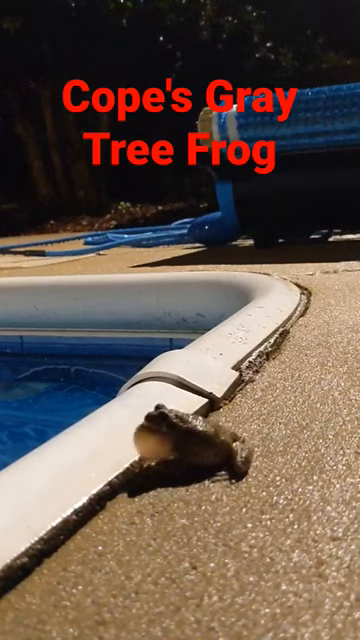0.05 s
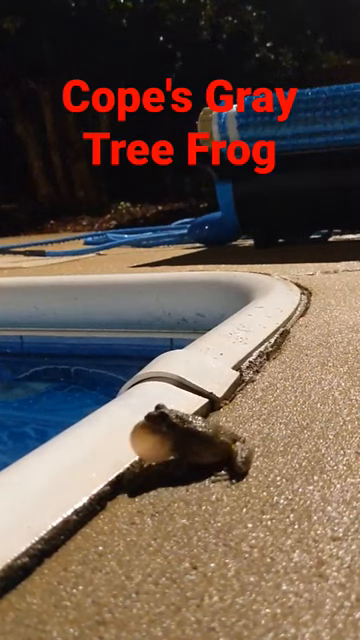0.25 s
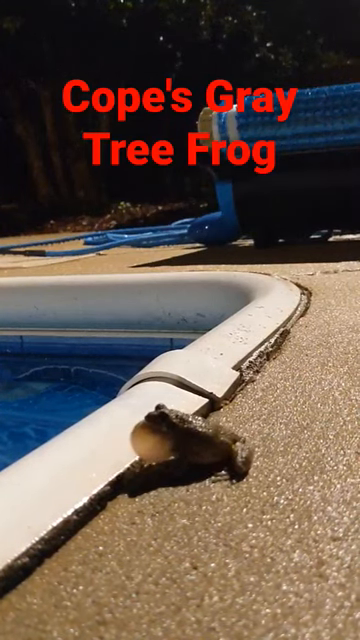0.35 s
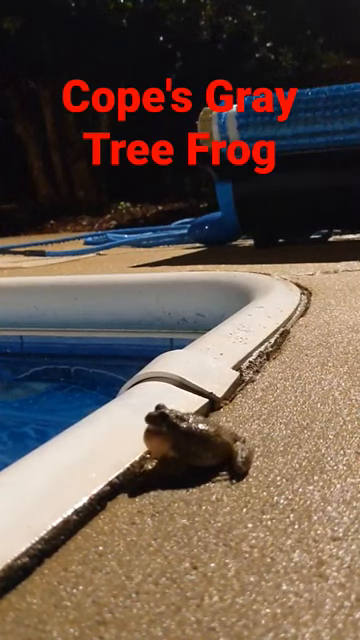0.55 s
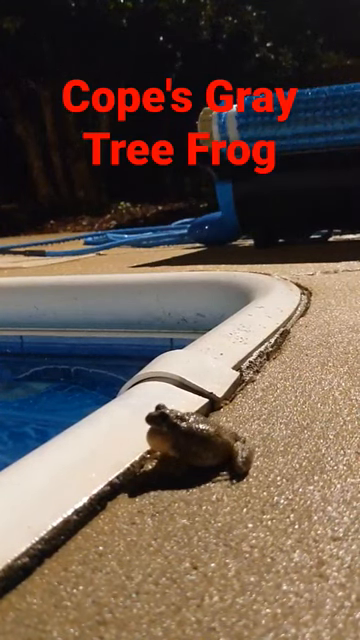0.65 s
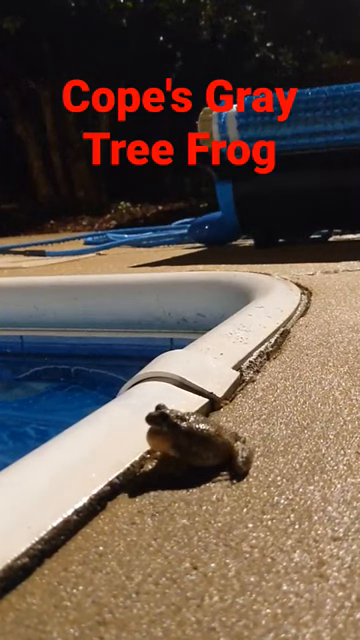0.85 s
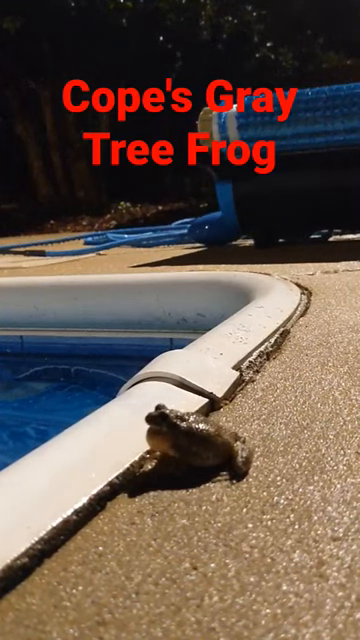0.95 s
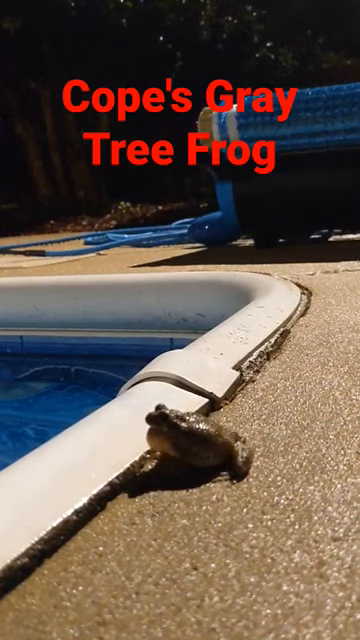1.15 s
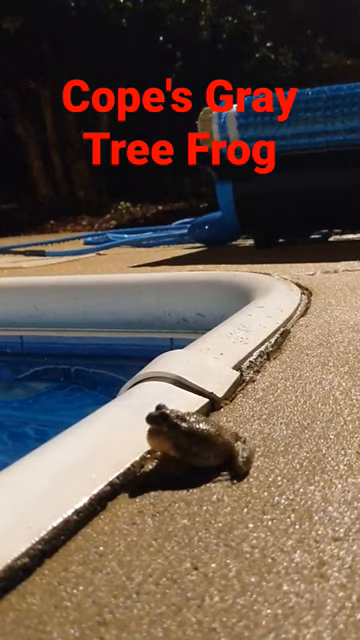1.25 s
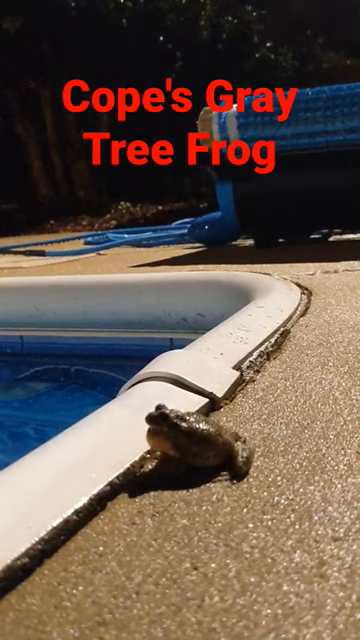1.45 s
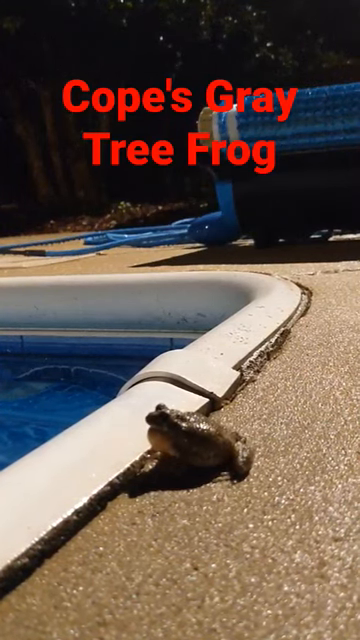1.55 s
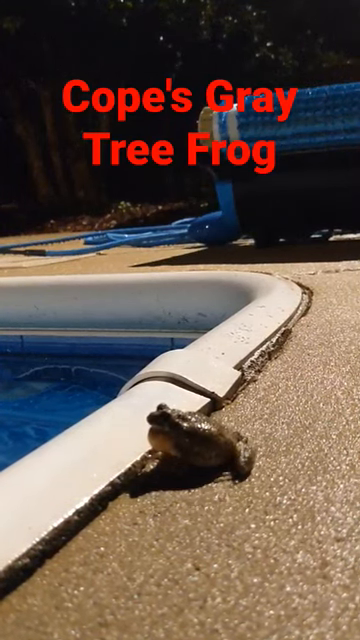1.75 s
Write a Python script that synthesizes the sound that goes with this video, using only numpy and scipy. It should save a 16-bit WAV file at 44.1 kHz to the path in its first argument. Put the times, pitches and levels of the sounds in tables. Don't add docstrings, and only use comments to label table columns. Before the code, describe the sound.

A tree frog close to the microphone gives a short, loud, buzzy trill of rapid rising chirps with slight echoes off hard walls; a farther frog answers softly, over pump hum, insect hiss and distant chorus.

```python
import sys
import numpy as np
from scipy import signal
from scipy.fft import rfft, irfft
from scipy.io import wavfile

SR = 44100
rng = np.random.default_rng(int(sys.argv[2]) if len(sys.argv) > 2 else 0)


def master_out(mix):
    frames = np.transpose(np.atleast_2d(mix))
    ceiling = np.clip(frames, -1, 1)
    pcm = np.round(ceiling * 32767).astype(np.int16)
    wavfile.write(sys.argv[1], SR, pcm)


def convert_level_to_amplitude(level_db):
    exponent = np.asarray(level_db, float) / 20
    return 10 ** exponent


N = 79380

# pitch_hz, level_db
AIR_TONE = [(30, -28), (42, -5), (100, -4), (300, -5.5), (1700, -20.5), (5000, -24), (8000, -31.5),
            (16000, -38)]
# pitch_hz, level_db
PUMP_HUM = [(53.5, -63), (58.3, -61.5), (120, -55.5), (126, -57), (156.5, -71), (240, -64), (291.5, -51),
            (350, -59.5), (360, -67), (419, -64.5), (480, -68), (581, -72.5), (640, -70), (700, -74)]
# pitch_hz, width_hz, throb_per_s, throb_db, level_db
CHORUS = [(1287, 570, 16, 4, -65), (2425, 460, 15, 1.5, -57), (3020, 320, 34, 0.5, -68),
          (4105, 780, 8.3, 3, -65.5), (5873, 566, 60, 1, -54), (9600, 1500, 24, -4.5, -76)]
# start_s, length_s, first_hz, last_hz, level_db
SQUEAKS = [
    (1.123, .07, 11600, 10900, -80),
    (1.28, .06, 11100, 11600, -79),
    (1.346, 0.045, 11800, 11000, -73),
    (1.533, .05, 11000, 11900, -72.5),
    (1.562, 0.079, 9500, 10400, -66.5),
    (1.59, .1, 14800, 15100, -80),
]
# start_s, fade_s, level_db
RUSTLES = [
    (0.777, 0.037, -57.5),
    (1.078, 0.013, -64),
    (1.66, .03, -62),
]
# peak_s, level_db
FAR_CHIRPS = [(0.685, -38.5), (0.7069, -42), (0.729, -40), (0.7483, -42), (0.768, -42.4), (0.7875, -42),
              (0.8092, -42), (0.8308, -41), (0.851, -41.5), (0.8725, -41), (0.893, -42), (0.915, -39),
              (0.937, -40.5), (0.9573, -39.5), (0.978, -40.7), (0.9995, -39.5), (1.0213, -40),
              (1.0434, -39.2), (1.0655, -39.5), (1.0862, -39), (1.1077, -39), (1.1301, -38), (1.1518, -40),
              (1.1737, -38.5), (1.1947, -39.5), (1.2187, -37.5)]
# pitch_hz, level_db
FAR_DULLNESS = [(2800, 0), (3150, -14), (3500, -14)]
ECHO_S = [.0033, .008, .0125, .03, .036, .053, .077, .081]
ECHO_DB = [-12, -20, -25, -19, -27, -27, -26, -27]
# peak_s, level_db
CHIRPS = [(0.2175, -18.9), (0.2407, -9.1), (0.2595, -6.2), (0.2798, -5.8), (0.3008, -5.3), (0.3214, -5.3),
          (0.3422, -6.0), (0.362, -5.7), (0.3832, -5.8), (0.4033, -5.9), (0.424, -6.0), (0.4446, -5.4),
          (0.4651, -5.9), (0.4854, -5.5), (0.5058, -5.5), (0.5263, -6.1), (0.547, -5.7), (0.5675, -5.6),
          (0.5887, -5.8), (0.6098, -5.0), (0.6315, -5.6), (0.6529, -5.7)]
# time_s, middle_pitch_hz, rise_hz_per_s, ring_s, fundamental_db, upper_partials_db, rasp_db
SAC = [
    (.217, 974, 30000, 0.003, 2, 10, -36),
    (0.24, 1183, 13900, 0.0023, 2, -15, -4),
    (0.256, 1138, 20400, 0.0029, -6, -1, 4),
    (0.298, 1213, 29200, 0.0028, -12.5, 1.5, 4),
    (.42, 1228, 33200, 0.0025, -12, -2, -2),
    (.652, 1236, 31600, 0.0031, -12, -4, -2.5),
]
PARTIALS_DB = [-12, -35, -33, -30.5]
# pitch_hz, level_db
RASP_TONE = [(3000, 17), (6000, 4), (8300, 2), (9000, -13), (11000, -15), (15800, -13)]
# pitch_hz, rise_hz_per_s, fade_s, level_db
WHISTLES = [
    (8050, -10000, .002, -35),
    (9750, -30000, .003, -45),
    (12000, -50000, .004, -48),
    (14950, -50000, .004, -47),
]
WHISTLE_LAG_S = [-.0005, .001, .0015, -.001]
# time_s, pitch_share
WHISTLE_TUNE = [(.238, .9), (.26, .96), (.3, 1.03), (.4, 1.0), (.65, .995)]
# pitch_hz, level_db
SAC_TONE = [(650, -12.5), (900, 4.5), (1100, 0)]
# time_s, level_db
GAIN = [
    (0, 6.5),
    (0.232, 6.5),
    (.27, -3.5),
    (.45, -7),
    (.66, -7),
    (.7, -4.5),
    (1.1, -2.5),
    (1.35, -1.5),
    (1.8, 1),
]

JITTER = .003


def evened(x):
    return x / np.sqrt(np.mean(x ** 2) + 1e-20)


def coloured(x, points):
    f, db = np.transpose(points)
    hz = np.fft.rfftfreq(len(x), 1 / SR)
    gain = convert_level_to_amplitude(np.interp(np.log(hz + 1), np.log(f), db))
    return irfft(rfft(x) * gain, len(x))


def band(x, hz, width_hz):
    f = np.fft.rfftfreq(len(x), 1 / SR)
    return irfft(rfft(x) / (1 + ((f - hz) / width_hz * 2) ** 4), len(x))


def add(mix, s, sound):
    part = mix[round(s * SR):][:len(sound)]
    part += sound[:len(part)]


def drift(per_s):
    return evened(band(rng.standard_normal(N), 0, 2 * per_s))


def bell(t, rise, fall):
    return np.exp(-.5 * (t / np.where(t < 0, rise, fall)) ** 2)


def tail(x, t60):
    t = np.arange(SR // 2) / SR
    sparse = rng.standard_normal(len(t)) * (rng.random(len(t)) < .06)
    taps = sparse * convert_level_to_amplitude(-60 * t / t60) * (t > .005)
    return signal.fftconvolve(x, taps / np.linalg.norm(taps))[:N]


def night():
    t = np.arange(N) / SR
    out = convert_level_to_amplitude(-55) * evened(coloured(rng.standard_normal(N), AIR_TONE))
    for hz, db in PUMP_HUM:
        level = convert_level_to_amplitude(db + 2.5 + 1.0 * drift(2))
        out += level * np.sin(2 * np.pi * (hz * t + .02 * drift(9) + rng.random()))
    for hz, width_hz, throb, throb_db, db in CHORUS:
        level = convert_level_to_amplitude(db + throb_db * drift(throb) + 0.4 * drift(7.5))
        out += level * evened(band(rng.standard_normal(N), hz, width_hz))
    return out


def small_things():
    out = np.zeros(N)
    for s, length, first_hz, last_hz, db in SQUEAKS:
        u = np.arange(0, 1, 1 / (length * SR))
        hz = first_hz + (last_hz - first_hz) * np.sin(u * np.pi / 2) + 60 * drift(60)[:len(u)]
        swell = np.sin(np.pi * u) ** .5
        add(out, s, convert_level_to_amplitude(db) * swell * np.sin(2 * np.pi * np.cumsum(hz) / SR))
    t = np.arange(SR // 8) / SR
    for s, fade, db in RUSTLES:
        add(out, s, convert_level_to_amplitude(db) * np.exp(-t / fade) * band(rng.standard_normal(len(t)), 11000, 7500))
    return out


def far_frog():
    middle_hz, rise_hz_per_s, swell_s = 1270, 50000, .0018
    out, t = np.zeros(N), np.arange(-441, 441) / SR
    for (s, db), luck in zip(FAR_CHIRPS, rng.standard_normal((len(FAR_CHIRPS), 2))):
        hz = middle_hz * (1 + JITTER * luck[0]) + rise_hz_per_s * t / 2
        turns = 2 * np.pi * hz * t
        chirp = np.sin(turns) + convert_level_to_amplitude(0.59 * luck[1]) * np.sin(2 * turns) + convert_level_to_amplitude(-32) * np.sin(3 * turns)
        add(out, s - .01, convert_level_to_amplitude(db + 2) * bell(t, swell_s, swell_s * 1.5) * chirp)
    echo = convert_level_to_amplitude(-11.5) * np.roll(out, round(.0045 * SR))
    out = coloured(out + echo, FAR_DULLNESS)
    wet = tail(out, 0.29)
    return out + convert_level_to_amplitude(-2.5) * (.5 * wet + band(wet, 2550, 1400))


def walls(x):
    taps = np.zeros(SR // 8)
    for s, db in zip(ECHO_S, ECHO_DB):
        taps[round(s * SR)] = convert_level_to_amplitude(db)
    back = signal.fftconvolve(x, taps)[:N] + convert_level_to_amplitude(-27) * tail(x, .4)
    return band(back, 2500, 1600) + .12 * back


def voice(u, turns, ring, low_db, up_db):
    rise_s, fall_s, late_s = .0021, .0016, .0017
    low = np.where(u < late_s, bell(u - late_s, 0.0039, 1), np.exp(-(u - late_s) / (ring + .001)))
    after = 0.1 * (u > 0) * (1 - bell(u, 1, fall_s)) * np.exp(-u / ring)
    sound = convert_level_to_amplitude(low_db) * low * np.sin(turns)
    sound += (bell(u, rise_s, fall_s) + after) * np.sin(2 * turns)
    for multiple, db in enumerate(PARTIALS_DB, 3):
        sound += convert_level_to_amplitude(db + up_db) * bell(u - .0005, .0022, .0013) * np.cos(multiple * turns)
    return sound


def whistles(s, t, thin_db, luck, fuzz):
    tune = np.interp(s, *np.transpose(WHISTLE_TUNE)) + JITTER * luck
    sound = np.zeros(len(t))
    for (hz, glide_hz, fade, db), lag, wobble in zip(WHISTLES, WHISTLE_LAG_S, fuzz):
        swell = np.where(t < lag, bell(t - lag, .0021, 1), np.exp(-(t - lag) / fade))
        if hz < 9000:
            filling_db = 14 if s < .25 else 0
        else:
            filling_db = np.interp(s, [.25, .32], [-14, 0])
        tone = np.sin(2 * np.pi * (hz * tune + glide_hz * t / 2) * t)
        sound += convert_level_to_amplitude(db + thin_db + filling_db) * swell * (1.2 + wobble) * tone
    return sound


def frog():
    out, t, sac = np.zeros(N), np.arange(-441, 882) / SR, np.transpose(SAC)
    chance = rng.standard_normal((len(CHIRPS), 2))
    hiss = evened(coloured(rng.standard_normal(N), [(2000, -46), *RASP_TONE]))
    fuzz = [drift(250) for _ in WHISTLES]
    for (s, db), luck in zip(CHIRPS, chance):
        hz, rise_hz, ring, low_db, up_db, thin_db = (np.interp(s, sac[0], c) for c in sac[1:])
        u = t / (.6 if s < .23 else 1)
        now = slice(round(s * SR), round(s * SR) + len(t))
        sweep_hz = hz * (1 + JITTER * luck[0]) + rise_hz * 0.0058 * np.tanh(t / 0.0035)
        turns = np.cumsum(sweep_hz) / SR
        turns = 2 * np.pi * (turns - turns[441])
        chirp = voice(u, turns, ring, low_db, up_db)
        rasp_swell = (bell(u, 0.011, 0.003) + 0.17) * (1 + np.cos(turns))
        chirp += convert_level_to_amplitude(-30 + thin_db) * rasp_swell * hiss[now]
        chirp += convert_level_to_amplitude(-34) * bell(u + .003, .0015, .003) * np.sin(2 * np.pi * 990 * t)
        chirp += whistles(s, t, thin_db, luck[1], [f[now] for f in fuzz])
        gate = np.clip((u + .0046) / .001, 0, 1)
        lead_s = .0012 * (.23 < s < .25)
        add(out, s - .01 - lead_s, convert_level_to_amplitude(db + 0.16) * gate * chirp)
    return coloured(out, SAC_TONE)


def scene():
    near, around = frog(), night()
    db = np.interp(np.arange(N) / SR, *np.transpose(GAIN))
    low = band(around, 0, 3000)
    ducked = low * convert_level_to_amplitude(db) + (around - low) * convert_level_to_amplitude(0.91 * db)
    return (near + walls(near) + far_frog() + ducked + small_things())[None]


def low_pass(x):
    return signal.sosfilt(signal.butter(12, 16270, fs=SR, output="sos"), x)


def record(dry):
    thump = band(dry[0] ** 2, 0, 440)
    thump = coloured(thump, [(30, -40), (50, -11.5), (120, 0)])
    limit = signal.firwin(511, 15520, window=("kaiser", 9), fs=SR)
    x = signal.oaconvolve(dry + convert_level_to_amplitude(-16) * thump, limit[None], "same")
    return low_pass(x)


dry = scene()
out = record(dry)
master_out(out)
```